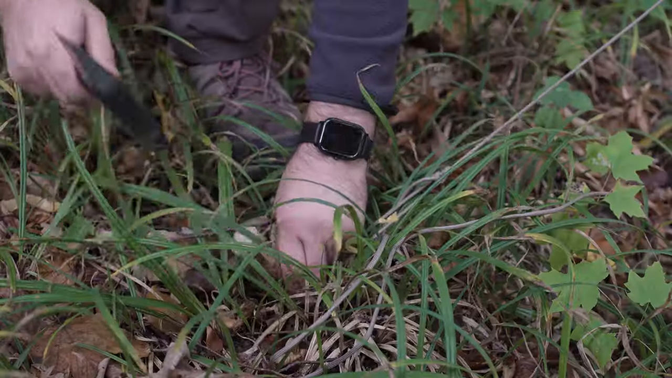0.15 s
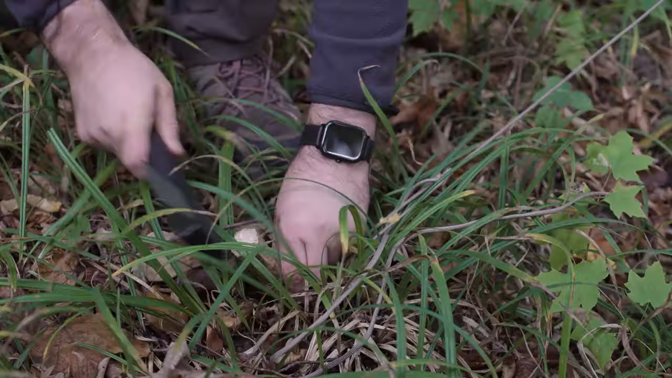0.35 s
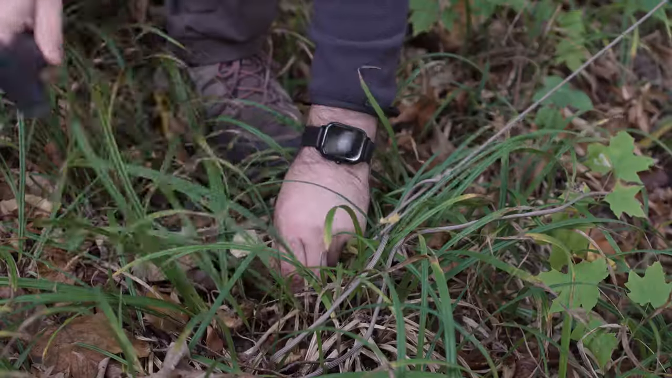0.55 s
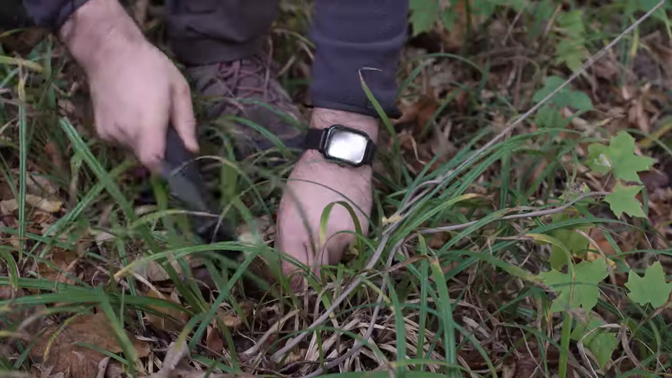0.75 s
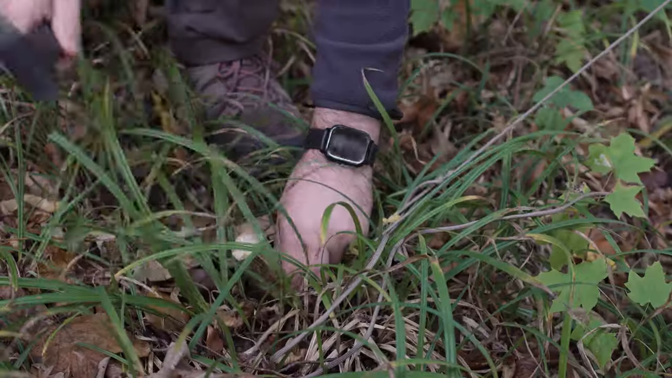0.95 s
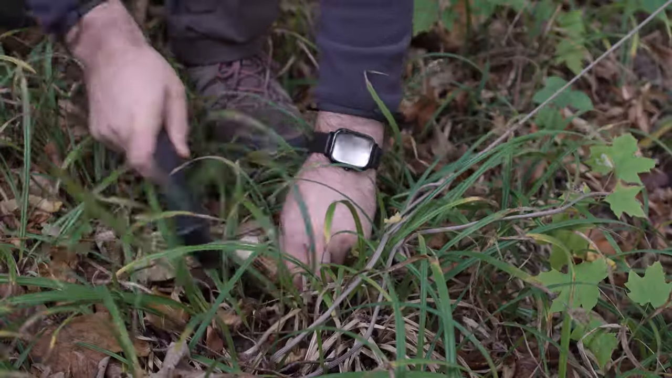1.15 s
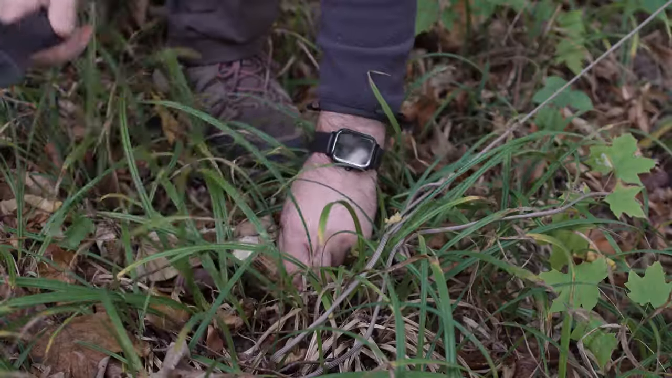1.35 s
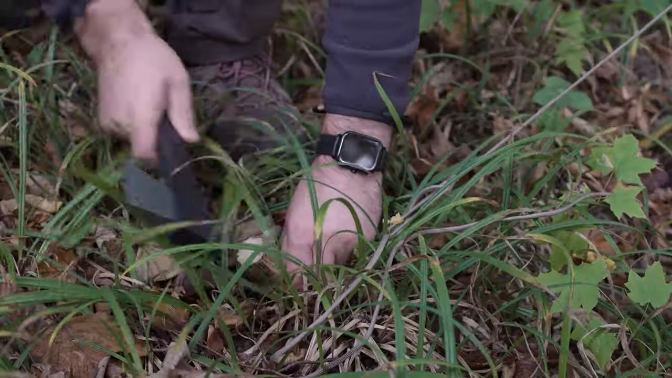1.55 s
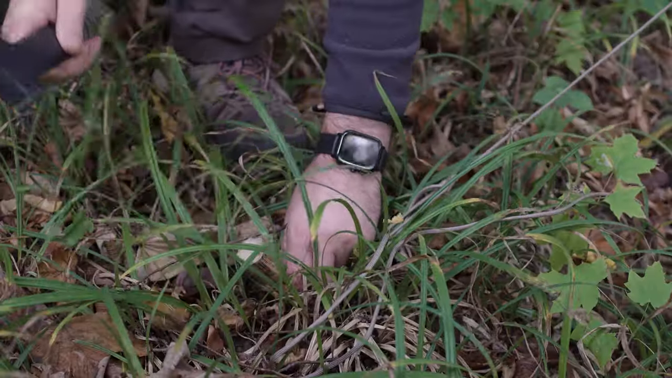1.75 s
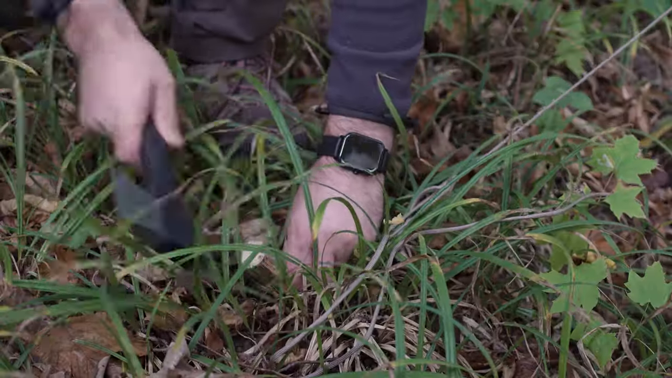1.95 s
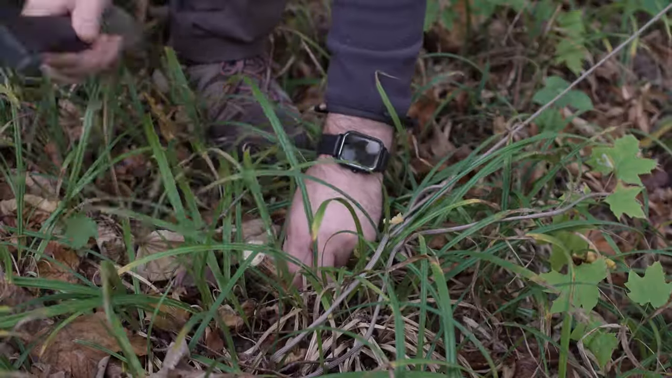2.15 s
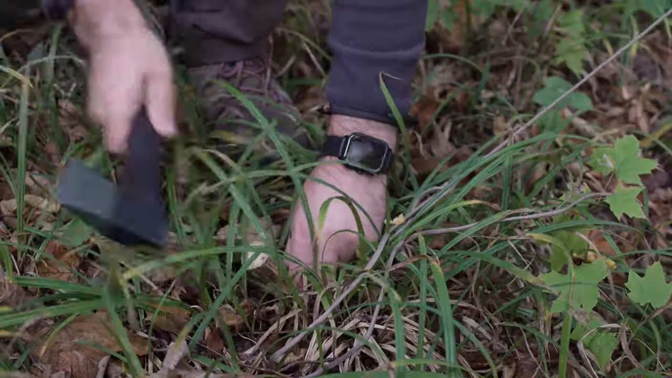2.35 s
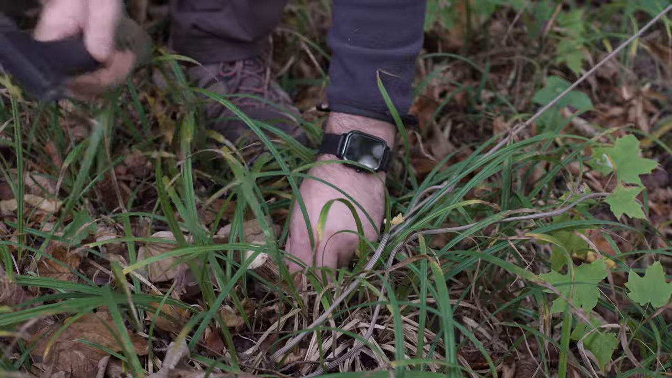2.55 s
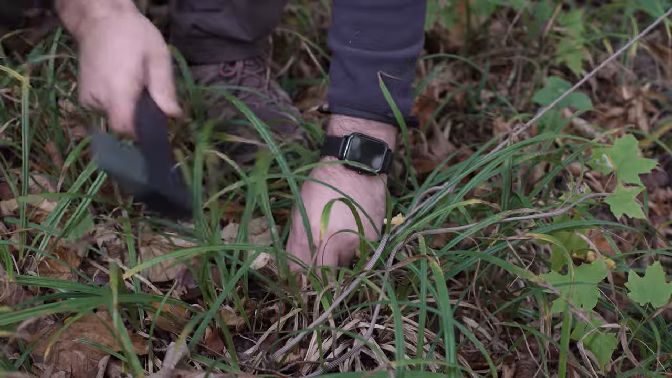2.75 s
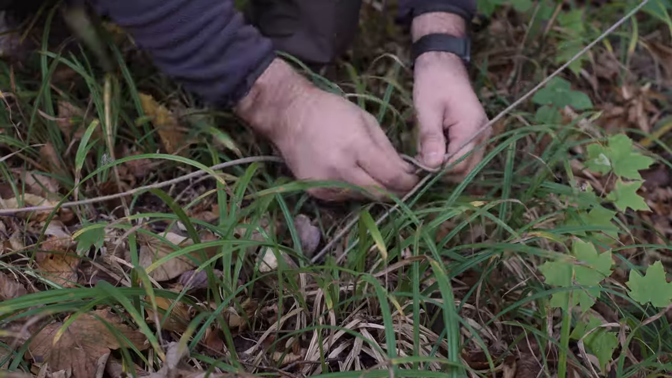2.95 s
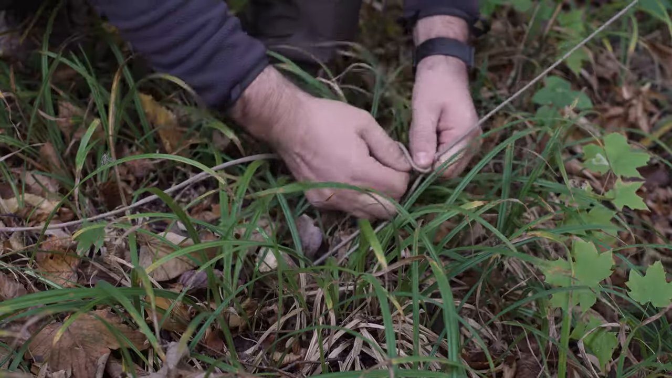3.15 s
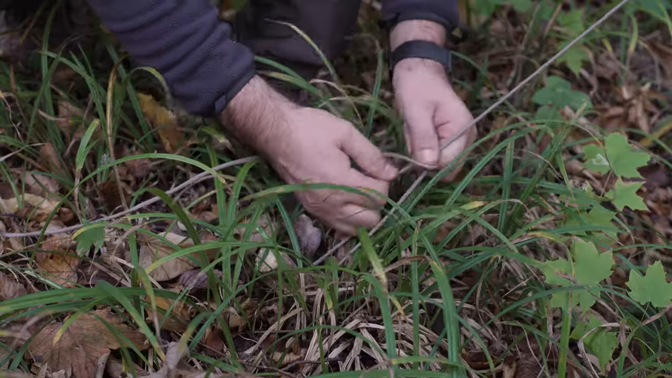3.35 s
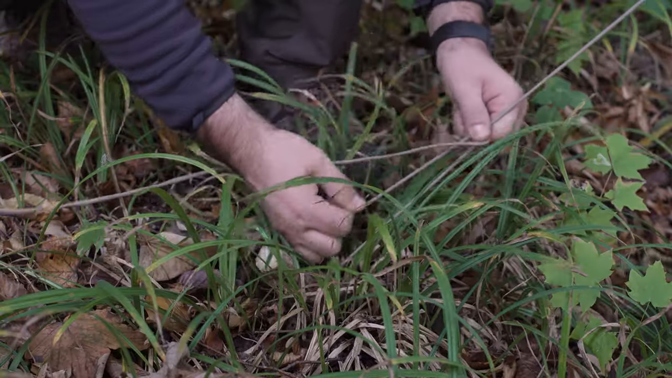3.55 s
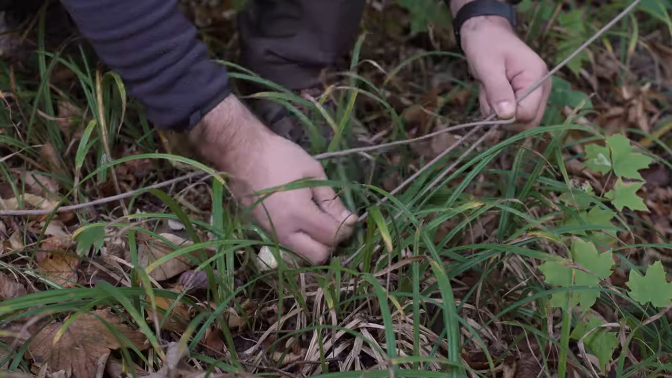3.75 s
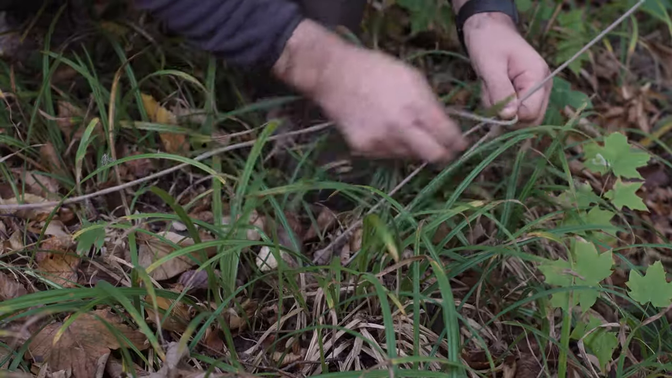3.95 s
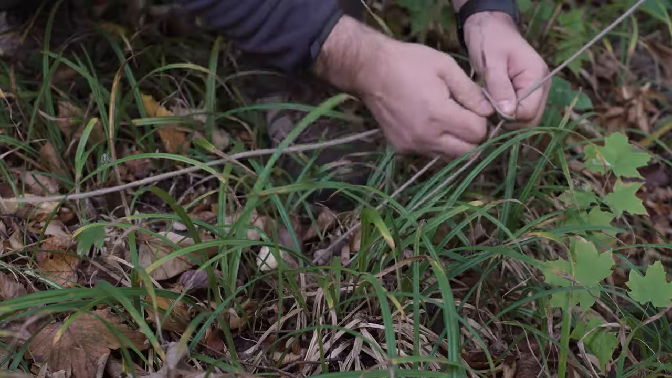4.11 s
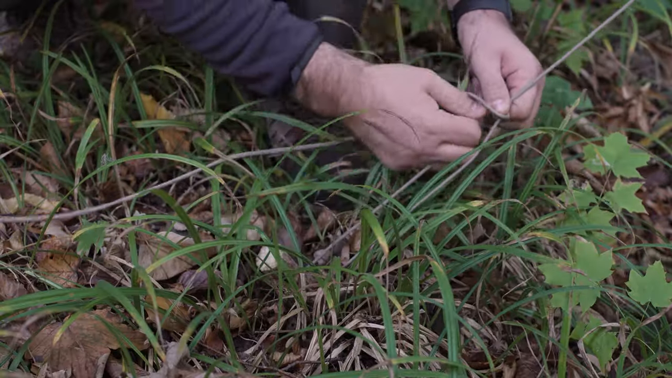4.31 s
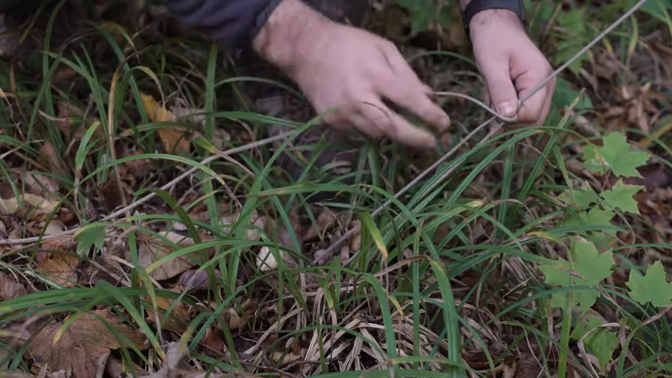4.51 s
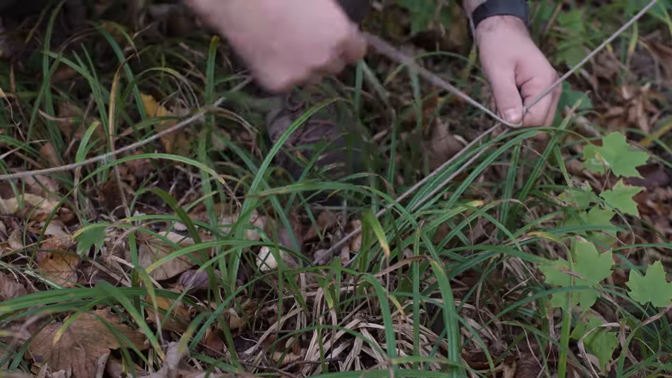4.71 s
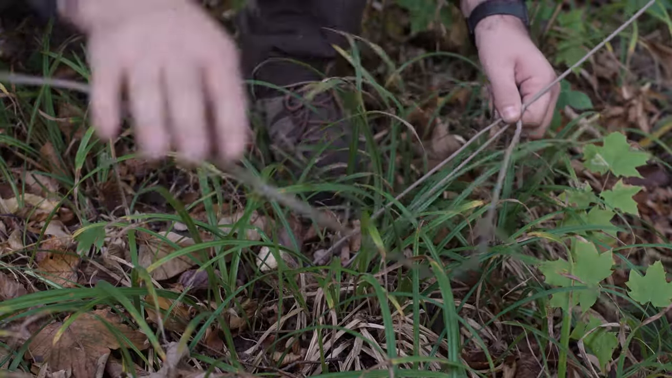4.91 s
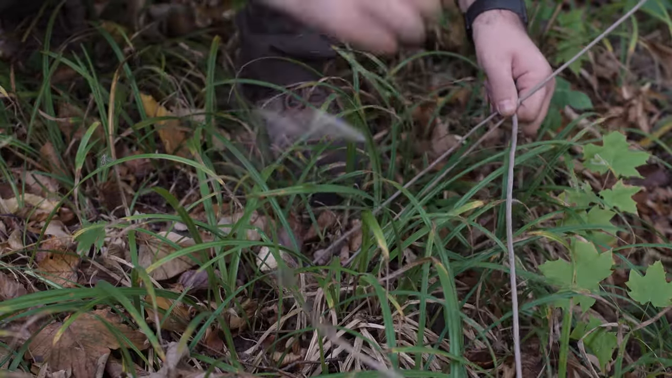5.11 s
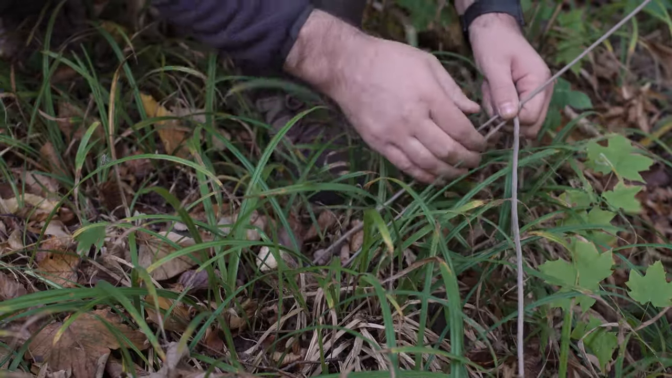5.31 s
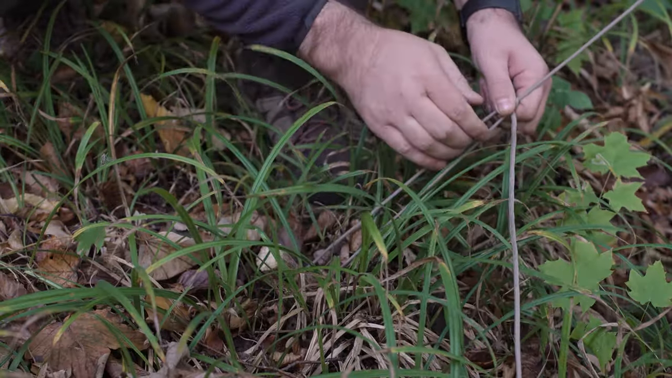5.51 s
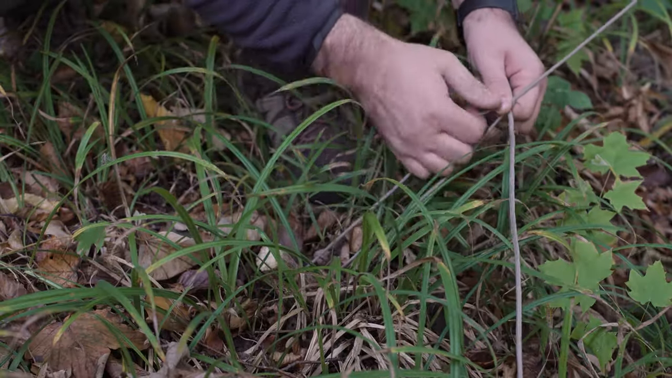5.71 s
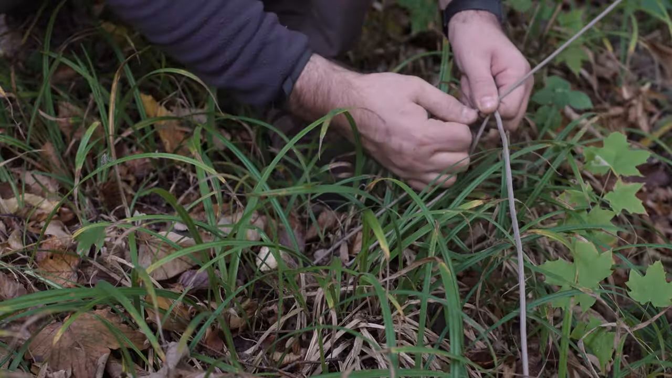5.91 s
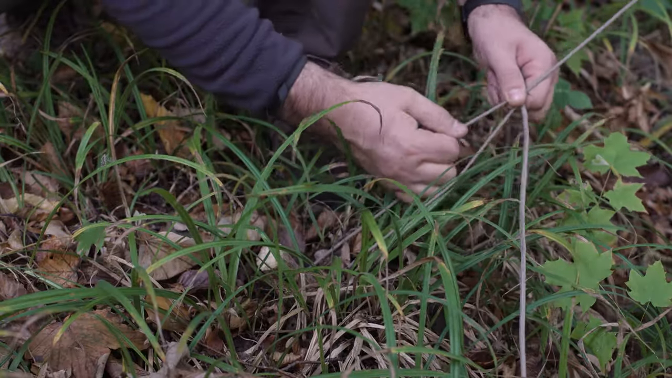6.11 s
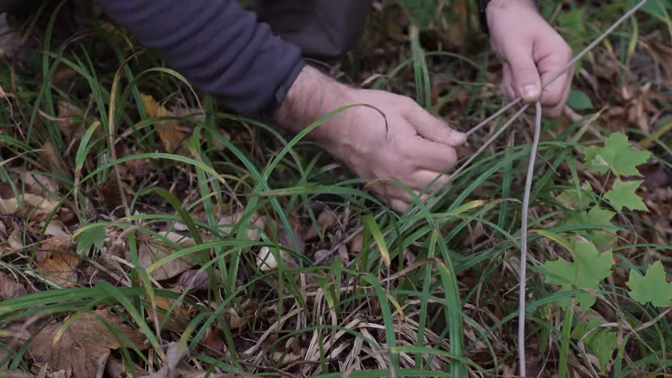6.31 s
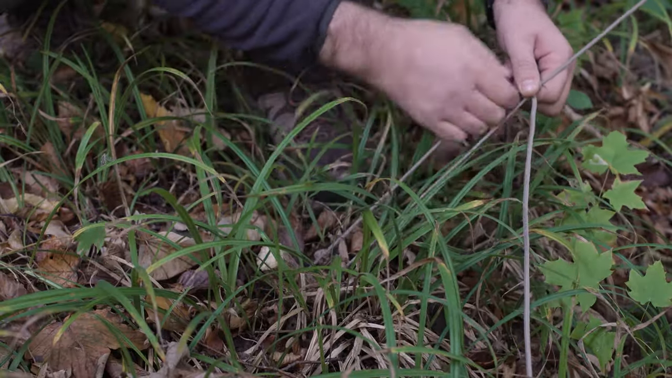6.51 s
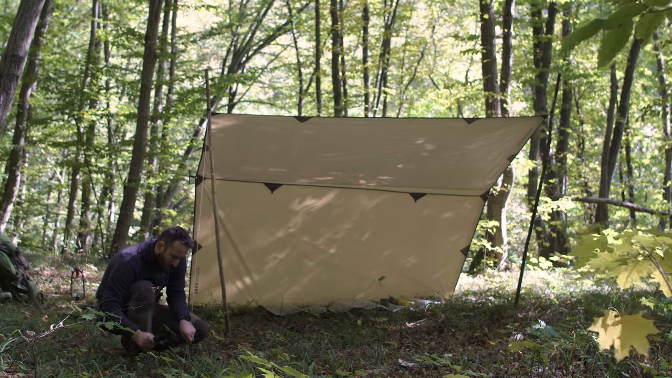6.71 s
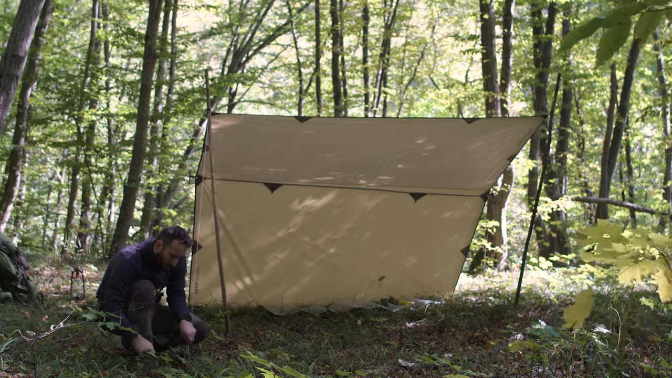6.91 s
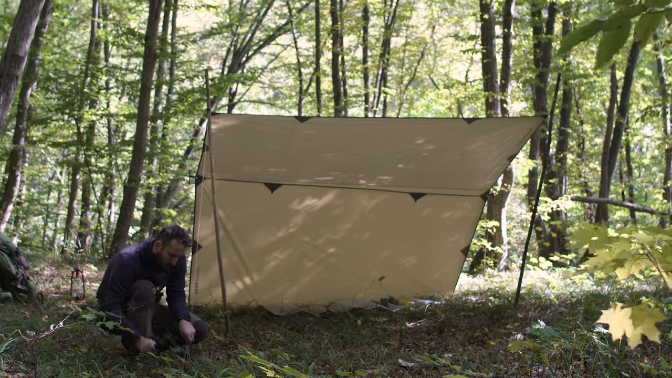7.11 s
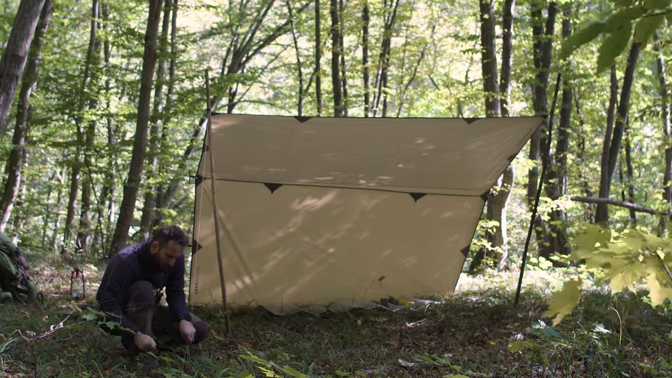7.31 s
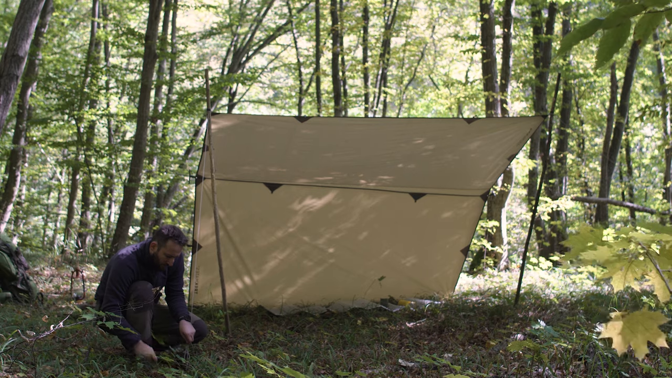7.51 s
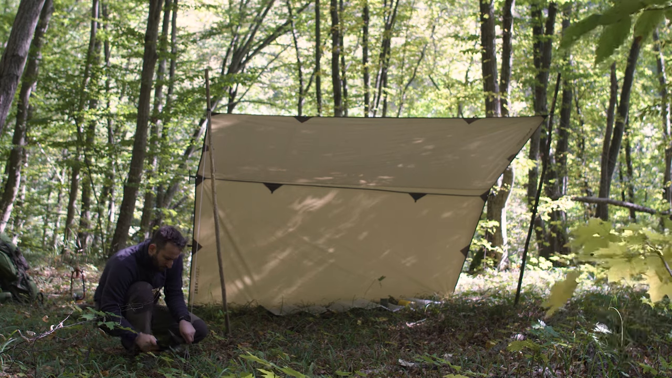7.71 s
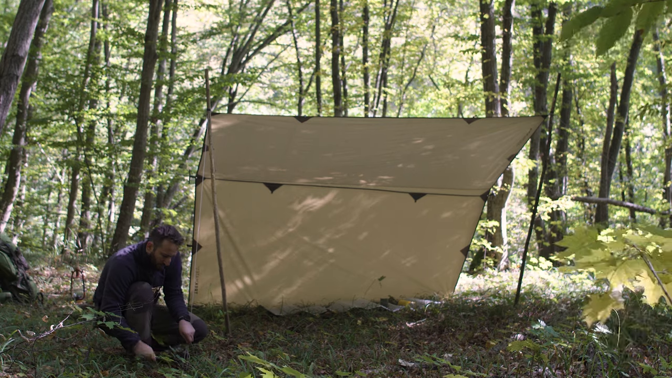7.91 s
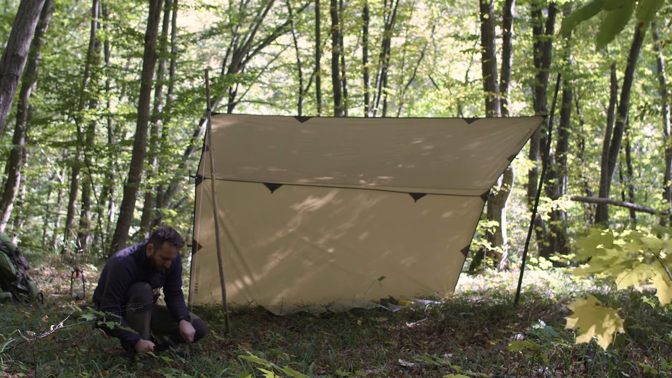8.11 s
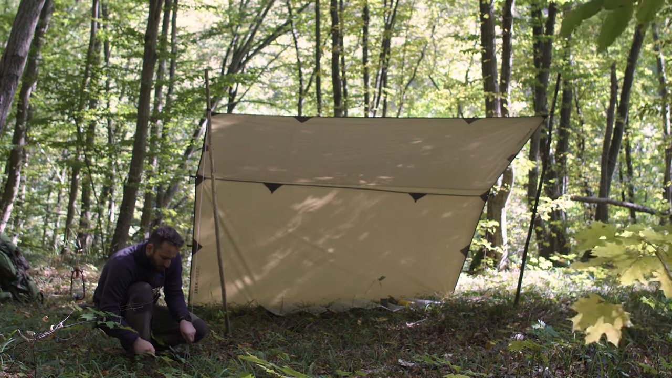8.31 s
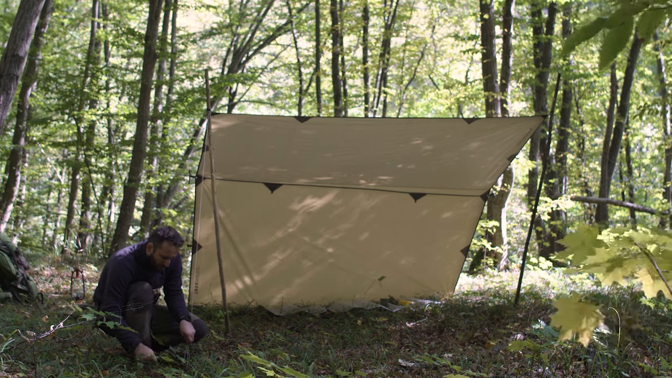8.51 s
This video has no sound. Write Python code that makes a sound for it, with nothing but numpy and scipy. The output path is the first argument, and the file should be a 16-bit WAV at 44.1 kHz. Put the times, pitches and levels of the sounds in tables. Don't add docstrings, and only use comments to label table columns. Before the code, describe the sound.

In a quiet wood, someone hammers a wooden stake with a heavy blade: seven close, sharp knocks at an even pace, slightly distorted at their loudest, with soil thuds and short tree echoes. Then hands pull cord through grass and dry leaves, rustling, rasping and snapping. Abruptly the microphone seems farther back, and five softer, quicker knocks ring out over faint leaf hiss.

```python
import sys
import numpy as np
from scipy import signal
from scipy.fft import rfft, irfft
from scipy.io import wavfile
from scipy.ndimage import uniform_filter1d

SR = 44100
rng = np.random.default_rng(int(sys.argv[2]) if len(sys.argv) > 2 else 0)


def unload_wav(signal):
    wavfile.write(
        sys.argv[1],
        SR,
        np.round(np.clip(np.atleast_2d(signal).T, -1, 1) * 32767).astype(np.int16),
    )


def volts_from_db(level):
    exponent = np.asarray(level, float) / 20
    return 10 ** exponent


N = 377055
T = np.arange(N) / SR
SHORT = T[:SR // 2]
CUT_S = 6.686


def add(out, s, x):
    i = int(round(s * SR))
    out[i:i + len(x)] += x[:len(out) - i]


def colour(x, points):
    hz, db = np.transpose(points)
    bins_hz = np.fft.rfftfreq(len(x), 1 / SR)
    gain_db = np.interp(np.log(bins_hz + 1), np.log(hz), db)
    return irfft(rfft(x) * volts_from_db(gain_db), len(x))


def unit(x):
    return x / np.sqrt(np.mean(x ** 2))


def walk(rate):
    k = int(SR / rate)
    held = np.repeat(rng.standard_normal(N // k + 1), k)
    return 1.3 * uniform_filter1d(uniform_filter1d(held, k), k)[:N]


def ring(modes, rise_s, detune=1):
    tones = sum(volts_from_db(db) * np.sin(2 * np.pi * hz * detune * SHORT) * 1000. ** (-SHORT / t60)
                for hz, db, t60 in modes)
    return tones * (1 - np.exp(-(SHORT / rise_s) ** 2))


def grains(per_s, scatter_db):
    hits = rng.random(N) < per_s / SR
    return hits * rng.standard_normal(N) * volts_from_db(scatter_db * np.minimum(rng.exponential(size=N), 3))


def soil_thud(soil, ground):
    thud = np.zeros(len(SHORT))
    for s, hz, length, db, sign in soil:
        lag = SHORT - s
        thud += sign * volts_from_db(db) * np.cos(2 * np.pi * hz * lag) * np.exp(-(lag / length) ** 2)
    thud *= 1 - np.exp(-SHORT / .001)
    add(thud, .019, ring(ground, rise_s=0.0067))
    return thud


# (frequency [Hz], gain [dB])
CRACK_COLOUR = [(1000, -15), (3500, -16), (4800, -2), (7000, 1.5), (10000, -6.5), (14000, -2),
                (16000, -19.5)]


def crack(t60_s, dull, tilt_db):
    burst = unit(colour(rng.standard_normal(len(SHORT)), CRACK_COLOUR)) * 1000. ** (-SHORT / t60_s)
    return colour(colour(burst, dull), [(3500, -tilt_db), (14000, tilt_db)])


# (frequency [Hz], level [dB], T60 [s])
SLAP_MODES = [(3760, 2, 0.035), (3900, -6, .03), (3590, -9, 0.12)]


def hammering(blows, spots, bites, bite, tilts, crack_t60, build, swing, dull, wood, soil, ground):
    knocks, body = np.zeros(N), np.zeros(N)
    thud = soil_thud(soil, ground)
    low, high, upper, blade = wood
    low_lag_s, contact_s, upper_rise_s, blade_rise_s = build
    for blow, spot, (bite_s, *bite_db), tilt_db in zip(blows, spots, bites, tilts):
        s, thud_db, high_db, blade_db, crack_db = blow
        low_db, upper_db, low_pct, high_pct, slap_db = spot
        low_tune, high_tune = 1 + low_pct / 100, 1 + high_pct / 100
        add(knocks, s + low_lag_s, swing * volts_from_db(low_db) * ring(low, contact_s, low_tune))
        add(knocks, s, volts_from_db(high_db) * ring(high, contact_s, high_tune))
        add(knocks, s, volts_from_db(upper_db) * ring(upper, upper_rise_s, high_tune))
        bitten = [(hz, db + more_db, t60) for (hz, db, t60), more_db in zip(bite, bite_db)]
        add(knocks, s + bite_s, ring(bitten, rise_s=0.00015))
        add(knocks, s + .0003, volts_from_db(crack_db) * crack(crack_t60, dull, tilt_db))
        add(body, s, volts_from_db(blade_db) * ring(blade, blade_rise_s) + volts_from_db(thud_db) * thud)
        add(body, s + 0.0248, volts_from_db(slap_db) * ring(SLAP_MODES, 0.0018, high_tune))
    return knocks, body


# (frequency [Hz], gain [dB])
CANOPY = [(700, -1), (1800, -2), (3000, .5), (3800, 1.5), (5000, -.5)]


def forest(knocks, blows, trunks, woods, echo, returns):
    clear = np.zeros(len(SHORT))
    for delay, db in trunks:
        add(clear, delay, volts_from_db(db) * np.ones(1))
    reflected = signal.fftconvolve(knocks, colour(clear, echo))[:N]
    swell, db, t60 = woods
    cloud = np.clip(SHORT / swell, .1, 1) ** 0.22 * 1000. ** (-SHORT / t60)
    level = np.zeros(N)
    for (s, _, high_db, *_), return_db in zip(blows, returns):
        add(level, s, volts_from_db(db + return_db + 1.31 * high_db) * cloud)
    return reflected + level * unit(colour(colour(grains(per_s=5000, scatter_db=2.2), echo), CANOPY))


# (time [s], soil thud [dB], high stake modes [dB], blade ring [dB], crack [dB])
NEAR_BLOWS = [
    (0.4273, 0, 0, -8, -16.5),
    (0.8245, 1, 4, -7, -12.5),
    (1.2114, 1.5, 7, 3, -13.5),
    (1.5939, -2, 7, -3.5, -10.5),
    (1.9744, 0.5, 8, 4, -10),
    (2.3592, -0.5, 8, -5, -10),
    (2.7376, 0, 9, -12.5, -14.5),
]
# (low modes [dB], upper modes [dB], low shift [%], high shift [%], slap echo [dB])
NEAR_SPOTS = [(3.7, -4, -1.6, 3.5, -42.5), (4.1, 2, 1.2, -1.2, -30), (4.5, 2, 1.92, -2, -34.5),
              (0.5, 12, 0.92, 1.2, -22), (3.2, 7, 0.42, 0.5, -31.5), (1.5, 11.5, -0.54, 0.8, -23),
              (3, 11.5, -1.1, 0.7, -25)]
# (lag [s], deep [dB], middle [dB], sharp [dB])
NEAR_BITES = [(.0002, 6.5, -12, -12), (.0002, -0.5, -2.5, -5.5), (.0003, 4, -5, -9), (.0002, 0, -12, -9),
              (.0002, -4.5, -7, -11.5), (.0002, -2, -20, -11), (.0002, -3, -17, -14)]
# (frequency [Hz], level [dB], T60 [s])
NEAR_BITE = [(1450, 0.1, 0.002), (1670, 0.1, 0.0094), (2376, 0.1, .011)]
NEAR_TILTS = [.3, -.3, .8, .3, .3, -.3, .3]
# (lag of low modes [s], contact [s], rise of upper modes [s], rise of blade ring [s])
NEAR_BUILD = (0.00034, 0.00034, 0.00064, 0.00096)
# (frequency [Hz], level [dB], T60 [s])
NEAR_WOOD = [
    [(1021, 7, 0.0055), (1288, -10.5, 0.013), (1603, -4, 0.0063), (845, -7.5, 0.011), (1340, -33, 0.25),
     (773, -39.5, 0.18)],
    [(1910, -5, 0.016), (1992, -12, 0.02), (2280, -7, 0.0064), (688, -1.6, 0.0057), (1428, -16.5, 0.013)],
    [(3072, -1.5, 0.0061), (3433, -9.5, 0.01), (4495, -1.3, 0.0037), (3840, -21, 0.016)],
    [(2863, -11, 0.025)],
]
# (arrival [s], frequency [Hz], length [s], level [dB], push + or pull - [share])
NEAR_PACKETS = [(.0013, 287, 0.0038, -3, 0.49), (0.011, 45, 0.014, -35, -0.81),
                (.0163, 106, .0085, -15.5, -1), (.0163, 212, .0095, -21, 1)]
# (frequency [Hz], level [dB], T60 [s])
NEAR_RING = [(78, -45, 0.39), (94.8, -35.5, 0.32), (113.5, -33, 0.29), (122.5, -38.5, 0.32),
             (148.6, -20, 0.14), (165.8, -35, 0.075), (191.3, -29.5, 0.12), (281, -31.5, 0.25)]
# (delay [s], level [dB])
NEAR_TRUNKS = [(0.0259, -25), (0.0386, -25), (.0495, -46.5)]
# (swell [s], level [dB], T60 [s])
NEAR_WOODS = (0.13, -38, 0.36)
# (frequency [Hz], gain [dB])
NEAR_ECHO = [(300, -4.5), (900, -15.5), (1350, -7), (1900, -7), (2800, -8), (3600, -2.5), (4300, -11),
             (5500, -16.5), (15000, -19.5)]
NEAR_RETURN_DB = [.1, .1, .1, 1.5, -.5, .5, .1]


def near_hammering():
    knocks, body = hammering(
        NEAR_BLOWS, NEAR_SPOTS, NEAR_BITES, NEAR_BITE, NEAR_TILTS, crack_t60=.0105, build=NEAR_BUILD,
        swing=-1, dull=[(1, 0.0029)], wood=NEAR_WOOD, soil=NEAR_PACKETS, ground=NEAR_RING)
    return knocks + body + forest(knocks, NEAR_BLOWS, NEAR_TRUNKS, NEAR_WOODS, NEAR_ECHO, NEAR_RETURN_DB)


# (time [s], soil thud [dB], high stake modes [dB], blade ring [dB], crack [dB])
FAR_BLOWS = [
    (6.6564, -16, 1.6, -35.5, -27),
    (6.962, 0, 2.5, -6.5, -29),
    (7.3032, -1, 6, -8, -19),
    (7.6506, -1, 5.2, -5, -20.5),
    (7.985, 0, 5.7, -4.5, -13),
    (8.3163, -2, 1.3, -11, -23),
]
# (low modes [dB], upper modes [dB], low shift [%], high shift [%], slap echo [dB])
FAR_SPOTS = [(-33, -1, -.2, -9.5, -36), (-10.5, 4.5, 0.16, -1.5, -48), (-12.5, 9.5, -0.5, -0.2, -44),
             (-11, 7.5, -.3, 3.5, -46), (-11.5, 8, .1, 2.2, -45.5), (-10.5, -1.3, 0.8, 3.2, -52)]
# (lag [s], deep [dB], sharp [dB], middle [dB])
FAR_BITES = [(.0002, -30, -30, -30), (.0002, -14, -20, -3), (.0002, -1, -17, -4), (.0002, -6, -15, -6),
             (.0002, 0.5, -17, -11), (.0002, -9, -20, -6)]
# (frequency [Hz], level [dB], T60 [s])
FAR_BITE = [(1690, 0.1, 0.0048), (2600, 0.1, 0.006), (2400, 0.1, 0.0036)]
FAR_TILTS = [.1, -1.5, -1.5, -2.5, -3, -3]
# (lag of low modes [s], contact [s], rise of upper modes [s], rise of blade ring [s])
FAR_BUILD = (0.00054, 0.0004, 0.001, 0.0047)
# (frequency [Hz], gain [dB])
FAR_PATH = [(3000, -2), (4800, -0.78), (7000, -0.28), (12000, -0.22)]
# (frequency [Hz], level [dB], T60 [s])
FAR_WOOD = [
    [(580, 3, 0.014), (805, 6, 0.0079), (1330, -4.5, 0.015)],
    [(2085, -3, 0.0075), (1813, -5, 0.0083), (2300, -26, 0.0105)],
    [(3270, 9.5, 0.0037), (3920, -16, 0.01)],
    [(2910, 4, 0.025), (3090, -11, 0.028)],
]
# (arrival [s], frequency [Hz], length [s], level [dB], push + or pull - [share])
FAR_PACKETS = [(.0026, 282, 0.0034, -6, 0.41), (0.013, 113, 0.0095, -23.5, -0.8),
               (.0115, 165, .008, -10, -1)]
# (frequency [Hz], level [dB], T60 [s])
FAR_RING = [(111.4, -33.5, 0.19), (150.3, -29, 0.2), (183, -30.5, 0.13), (210, -35, 0.1), (286, -38, 0.17)]
# (delay [s], level [dB])
FAR_TRUNKS = [(0.0223, -19.5), (0.0309, -26.5), (0.039, -35), (.046, -45), (0.053, -37)]
# (swell [s], level [dB], T60 [s])
FAR_WOODS = (0.02, -39, 0.55)
# (frequency [Hz], gain [dB])
FAR_ECHO = [(300, -7), (900, -7.5), (1400, -4), (2000, -9), (2600, 0), (3600, -2), (4500, -10.5),
            (5500, -16), (15000, -30)]
FAR_RETURN_DB = [.1, -2, .5, .5, .1, -5]


def far_hammering():
    knocks, body = hammering(
        FAR_BLOWS, FAR_SPOTS, FAR_BITES, FAR_BITE, FAR_TILTS, crack_t60=.008, build=FAR_BUILD,
        swing=1, dull=FAR_PATH, wood=FAR_WOOD, soil=FAR_PACKETS, ground=FAR_RING)
    return knocks + body + forest(knocks, FAR_BLOWS, FAR_TRUNKS, FAR_WOODS, FAR_ECHO, FAR_RETURN_DB)


def snap_burst(hz):
    size, middle = 512, 256
    burst = rng.standard_normal(size) * np.exp(-(np.arange(size) - middle) ** 2 / (.0004 * SR) ** 2)
    burst[middle] += 4
    after, chance = np.arange(middle) / SR, rng.random((2, middle))
    splinters = (chance[0] < .05) * (2 * chance[1] - 1) * np.exp(-after / 0.0029)
    burst[middle:] += volts_from_db(11) * splinters
    burst = colour(burst, [(hz / 12, -60), (hz / 4, -26), (hz / 1.4, -6), (hz, 0), (hz * 1.5, -9), (hz * 3, -22)])
    return burst / np.abs(burst).max()


# (time [s], peak level [dB], frequency [Hz])
SNAPS = [(0.0388, -23, 7600), (0.0573, -25, 6800), (.0635, -29, 6700), (.132, -33, 3520),
         (.293, -31.5, 3500), (.365, -34, 11000), (.4172, -30, 7000), (0.4254, -15, 6500),
         (0.721, -31.5, 9000), (0.812, -31.5, 3500), (.818, -23, 3500), (1.1315, -32, 7800),
         (1.187, -36, 5000), (1.2035, -19, 9000), (1.534, -32, 6000), (1.5735, -13, 6000),
         (1.582, -13, 9000), (1.455, -39, 4500), (1.482, -38.5, 4300), (1.546, -35, 8000),
         (.735, -35.5, 7200), (1.9565, -21, 9000), (1.961, -19, 12000), (1.9735, -13, 3500),
         (1.9803, -11, 6800), (2.02, -19.5, 7000), (2.346, -14, 5500), (2.3581, -6.5, 5070),
         (2.364, -20.5, 10000), (2.7369, -4, 5000), (2.846, -31, 10650), (6.948, -36.5, 9000),
         (7.974, -35, 11000)]
# (time [s], peak level [dB], frequency [Hz])
HAND_SNAPS = [(3.028, -30.5, 3590), (3.0767, -35, 2860), (3.131, -38, 3860), (3.1433, -29, 3780),
              (3.248, -25, 4650), (3.2787, -28, 3470), (3.3465, -28, 3710), (3.3712, -26, 3790),
              (3.4233, -24, 6130), (3.456, -16.5, 2700), (3.5421, -25.5, 3080), (3.5553, -26, 2860),
              (3.5957, -25, 3760), (3.676, -4.5, 2630), (3.702, -22, 3370), (3.8778, -21, 3570),
              (4.3697, -35, 3100), (4.5052, -27, 2700), (4.5537, -30, 2640), (4.6318, -30.5, 2620),
              (4.6733, -30, 2370), (4.7406, -31, 2510), (4.995, -27, 4000), (5.025, -23, 4860),
              (5.0818, -27, 3420), (5.1153, -30.5, 3100), (5.175, -38, 2850), (5.2086, -30, 3260),
              (5.4366, -18, 3570), (5.9, -33.5, 2230), (5.9843, -33, 3510), (6.0054, -26, 4600),
              (6.0196, -29, 3290), (6.049, -33.5, 2340), (6.208, -22, 3460), (6.2505, -24, 2960),
              (6.3092, -38, 2200), (6.3423, -28, 3050), (6.4931, -44, 2540), (6.614, -39, 3150)]
# (time [s], peak level [dB], frequency [Hz])
TICKS = [(0.1404, -37, 3170), (0.1634, -36, 3620), (0.1944, -38, 3520), (0.2144, -42, 3200),
         (0.3267, -38, 3800), (2.7864, -26, 3440), (5.1756, -38, 2830), (5.1824, -38, 3000),
         (5.1936, -31, 3620), (5.2284, -33, 3720), (5.2864, -28, 2940), (5.2984, -29, 3710),
         (5.3584, -31, 3540), (5.3717, -30, 2760), (5.3914, -30, 2940), (5.4094, -26, 2710),
         (5.4204, -26, 3190), (5.854, -39, 3250), (6.0492, -32, 3550)]
# (time [s], peak level [dB], frequency [Hz])
THIN_TICKS = [(0.0984, -42, 9430), (0.2084, -39, 7000), (0.2634, -43, 9770), (0.3804, -41, 7920),
              (0.4404, -27, 11100), (0.9284, -40, 7010), (0.9694, -43, 7030), (1.2974, -37, 7150),
              (1.3254, -39, 12100), (1.8028, -43, 7670), (1.8174, -48, 6940), (1.8692, -47, 11800),
              (1.8954, -47, 7770), (1.926, -34, 7250), (2.0582, -30, 9970), (2.0634, -35, 6970),
              (2.1206, -39, 12900), (2.1524, -47, 6520), (2.2674, -47, 8710), (2.3072, -32, 11500),
              (2.3201, -31, 6820), (2.3805, -27, 6830), (2.5252, -40, 9720), (2.6948, -35, 8370),
              (2.7984, -37, 8180), (4.5535, -35, 7030), (5.0404, -38, 6960), (5.0818, -33, 8370),
              (5.1153, -41, 7180), (5.3784, -27, 7490), (5.897, -36, 8430), (6.4936, -34, 8100),
              (6.6164, -42, 6600), (8.2901, -45, 11000), (8.3014, -22, 10000)]


def snaps():
    out = np.zeros(N)
    by_hand = [(s, 0.82 * (db + 25) - 26.5, hz) for s, db, hz in HAND_SNAPS]
    springing = [(s, db - 2.5, hz) for s, db, hz in TICKS + THIN_TICKS]
    for s, db, hz in SNAPS + by_hand + springing:
        add(out, s + 0.00053 - 256 / SR, volts_from_db(db + 0.7) * snap_burst(hz))
    return out


# (start [s], swell [s], hold [s], fade [s], level [dB])
STROKES = [(2.976, 0.064, 0.043, 0.058, -42.5), (3.132, 0.018, 0.0184, 0.2, -43.5),
           (3.294, 0.064, 0.0323, 0.0217, -46.5), (3.417, 0.0339, 0.28, 0.032, -35),
           (3.754, 0.07, 0.0426, 0.0215, -41), (3.86, 0.029, 0.085, 0.13, -33.5),
           (4.039, 0.09, 0.026, 0.053, -39), (4.19, 0.0163, 0.095, 0.037, -55),
           (4.379, 0.0194, 0.12, .02, -56), (4.49, 0.015, 0.012, 0.11, -44), (4.58, 0.043, 0.31, 0.04, -54),
           (4.797, 0.034, 0.029, 0.0194, -49), (4.859, 0.046, 0.051, 0.0475, -38),
           (4.984, 0.018, 0.0445, 0.074, -52.5), (5.166, 0.014, 0.051, 0.059, -45),
           (5.245, 0.03, 0.019, 0.069, -40.5), (5.319, 0.054, 0.046, 0.0763, -37.5),
           (5.528, 0.0105, 0.017, 0.02, -57), (5.777, 0.1, 0.023, 0.032, -52),
           (6.002, 0.053, 0.0107, 0.0264, -45.5), (6.112, 0.035, 0.132, 0.055, -45),
           (6.327, 0.023, .02, 0.023, -52.5), (6.388, 0.0225, 0.056, 0.092, -58),
           (6.537, 0.042, .03, 0.083, -57.5)]
BUSY = T > STROKES[0][0]


def hand_strokes():
    hands = np.zeros(N)
    for s, swell, hold, fade, db in STROKES:
        shape = np.minimum(SHORT / swell, (swell + hold + fade - SHORT) / fade)
        add(hands, s, volts_from_db(db) * np.clip(shape, 0, 1) ** 1.19)
    return hands


# (lead [s], level [dB], softness of start [exponent], extra treble [dB])
SWISH = [(0.016, -36, 0.36, 0), (0.024, -37.5, .7, -0.5), (0.032, -35.5, .8, 8), (0.0208, -35, .1, -1),
         (0.021, -34, 0.26, 2.5), (0.039, -47, 0.2, 0.5), (0.02, -37, .6, 4.5), (0.014, -61, .3, .1),
         (0.04, -64, .3, 1.5), (0.029, -61.5, .3, -1), (0.019, -59, .3, .1), (0.012, -63, .3, .1)]


def blade_sweeps():
    level, treble = np.zeros(N), np.zeros(N)
    for (s, *_), (lead, db, soft, treble_db) in zip(NEAR_BLOWS + FAR_BLOWS[1:], SWISH):
        before = T < s
        share = np.clip((T - s + lead) / lead, 0, 1)
        approach = volts_from_db(-12.5) * np.clip((T - s) / (2.5 * lead) + 1, 0, 1) ** 0.85
        sweep = share ** soft * volts_from_db(4.5 - 3.5 * share) + approach
        level += volts_from_db(db + 3.17 * walk(150)) * before * sweep
        treble += treble_db * before * (T > s - 2 * lead)
    return level, treble


def settling():
    level = np.zeros(N)
    shape = (1 - np.exp(-SHORT / 0.011)) * 1000. ** (-SHORT / 0.23)
    for blows, db in ((NEAR_BLOWS, -35.5), (FAR_BLOWS[1:], -57)):
        for s, *_ in blows:
            add(level, s, volts_from_db(db) * shape)
    return level


# (frequency [Hz], level [dB/Hz])
GRASS = [(120, -45), (200, -4), (299, -18), (366, -8), (409, -8.5), (569, -7), (735, -17), (806, -10),
         (1770, -7.5), (2860, -1.5), (3830, -5), (9230, -9), (12400, -10), (16000, -12.5)]


def litter(level, treble_db, bass_db):
    out, shared = np.zeros(N), walk(90)
    ticks = .55 * unit(grains(per_s=120, scatter_db=2.5))
    hz, db = np.transpose(GRASS)
    for centre in 250 * 2 ** np.arange(0, 6.1, 1 / 3):
        edges_hz = centre * 2 ** (np.array([-1, 1]) / 6)
        band = signal.butter(2, edges_hz, "band", fs=SR, output="sos")
        treble_share = np.clip(np.log2(centre / 4000) / .6, 0, 1)
        bass_share = np.clip(np.log2(2000 / centre) / 2, 0, 1)
        small_grains = (.65 - .15 * treble_share) * unit(grains(per_s=250, scatter_db=2.8))
        rub = rng.standard_normal(N) + ticks + small_grains
        band_db = np.interp(np.log(centre), np.log(hz), db) + treble_share * treble_db + bass_share * bass_db
        band_db = band_db + 1.5 * shared + 1.3 * walk(40)
        out += volts_from_db(band_db) * signal.sosfilt(band, rub)
    return level * out * volts_from_db(5.5)


def rustle():
    hands = hand_strokes()
    sweeps, sweep_treble = blade_sweeps()
    kneeling = (T < CUT_S) * volts_from_db(-56 - 1.0 * BUSY + 0.72 * walk(25.0))
    hand_treble = 1 - 0.16 * (20 * np.log10(hands + volts_from_db(-42.0)) + 36.5)
    place_treble = np.where(BUSY, np.where(T < CUT_S, hand_treble, 8.5), 1)
    flicker = 1.5 * walk(190) + 0.85 * walk(30)
    bass_db = -.15 * 20 * np.log10(hands / volts_from_db(-46) + 1)
    return litter(hands + kneeling + sweeps + settling(), flicker + sweep_treble + place_treble, bass_db)


# (start [s], length [s], from [Hz], to [Hz], level [dB])
RASPS = [
    (3.323, 0.095, 3550, 3830, -39.5),
    (3.445, 0.166, 2690, 3100, -40),
    (3.544, 0.13, 3750, 4080, -35),
    (3.63, .11, 3006, 3470, -36),
    (3.864, 0.12, 3700, 3770, -34),
    (4.887, 0.073, 3450, 3780, -35),
    (5.262, 0.044, 2950, 2980, -38),
    (6.01, 0.059, 3290, 3110, -47),
    (6.13, 0.17, 3370, 3598, -45.5),
]


def cord():
    out, rough = np.zeros(N), walk(740) * volts_from_db(1.9 * walk(120))
    for s, length, from_hz, to_hz, db in RASPS:
        hz = from_hz + (to_hz - from_hz) * SHORT / length
        edge = np.clip(np.minimum(SHORT, length - SHORT) / 0.022, 0, 1)
        phase = 2 * np.pi * np.cumsum(np.minimum(hz, SR / 4)) / SR
        add(out, s, volts_from_db(db - 3.5) * edge * np.sin(phase))
    return out * rough


# (time [s], level [dB])
SHIFTS = [
    (0.046, -46),
    (2.997, -54),
    (4.289, -52),
    (5.419, -60),
    (6.24, -58),
]


def weight_shifts():
    out = np.zeros(N)
    for s, db in SHIFTS:
        add(out, s, volts_from_db(db) * ring([(151.8, 7.5, 0.12), (116.0, -4.0, 0.23), (191.5, -11.5, 0.102)], rise_s=0.0053))
    return out


def air(spectrum, db):
    return volts_from_db(db + 0.86 * walk(1.79)) * unit(colour(rng.standard_normal(N), spectrum))


# (frequency [Hz], level [dB/Hz])
NEAR_AIR = [(15, -52), (25, -4), (70, -12), (344, -0.5), (427, -1), (624, 2.5), (1020, -3.5), (1260, 0),
            (2160, -6), (3250, -6), (4030, -7.5), (4740, -19.5), (12500, -37), (14800, -33), (16000, -26)]
# (frequency [Hz], level [dB/Hz])
RUMBLE = [(20, -10), (90, -7), (200, -7), (400, -33)]


def near_background():
    opening_db = 3.5 * np.exp(-T / 0.12)
    return air(NEAR_AIR, -50 + opening_db) + ~BUSY * air(RUMBLE, -72)


# (frequency [Hz], level [dB/Hz])
FAR_AIR = [(15, -50), (25, -11.5), (87, -12), (170, -8.5), (249, -8.5), (405, -4), (503, -4), (659, 0.5),
           (734, -3), (1160, -3), (1560, -4.5), (2480, -5.5), (3340, -7), (7710, -26), (16000, -27.5)]


def far_background():
    return air(FAR_AIR, -47.5)


def scene():
    near = near_hammering() + near_background()
    far = far_hammering() + far_background()
    place = np.where(T < CUT_S, near, far)
    return (place + snaps() + rustle() + cord() + weight_shifts())[None]


def top_cut(x):
    return signal.sosfilt(signal.butter(12, 16430, fs=SR, output="sos"), x)


def record(dry):
    lowpass = signal.ellip(8, .2, 40, 15800, fs=SR, output="sos")
    mix = np.clip(signal.sosfilt(lowpass, dry), -1, 1)
    return top_cut(mix)


dry = scene()
out = record(dry)
unload_wav(out)
```